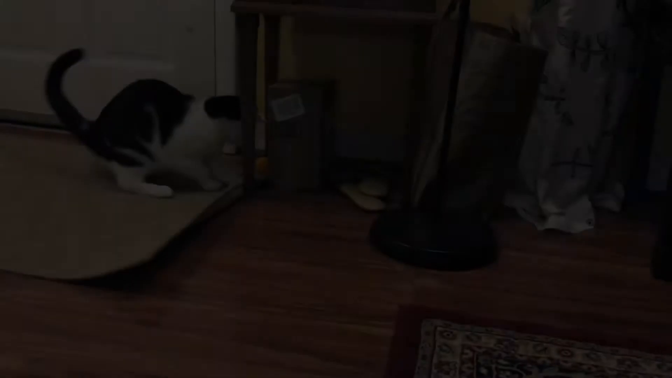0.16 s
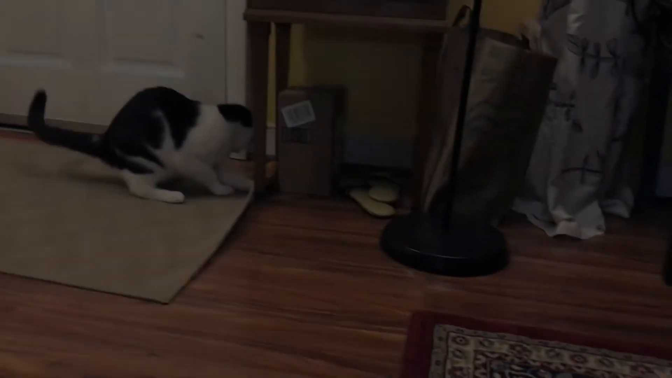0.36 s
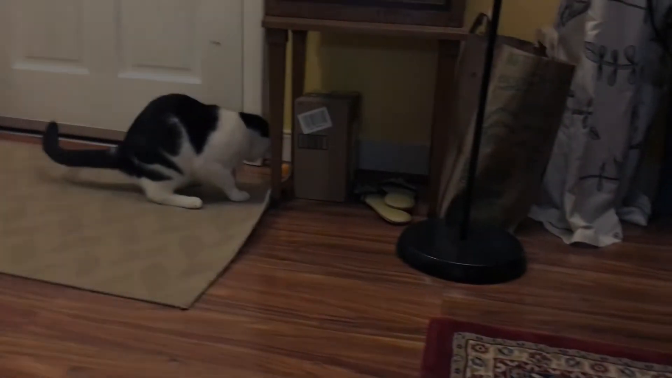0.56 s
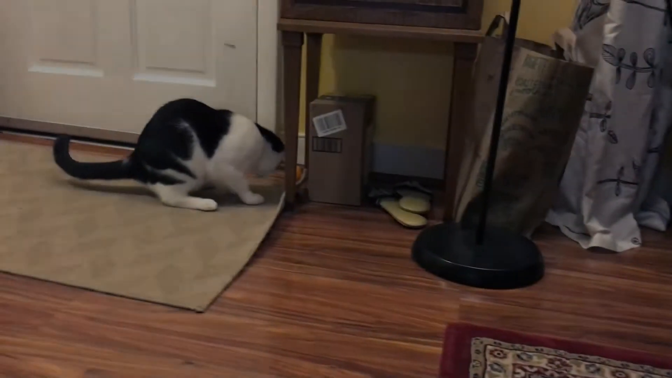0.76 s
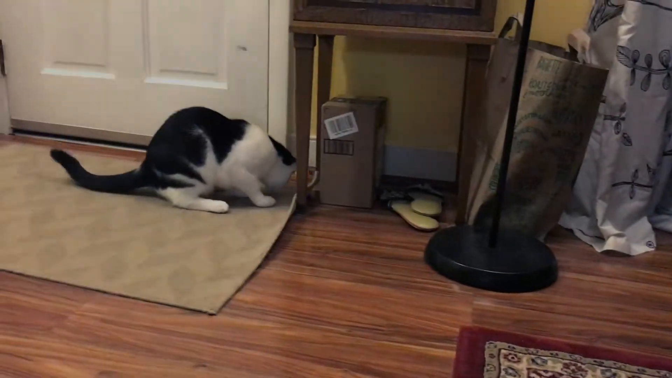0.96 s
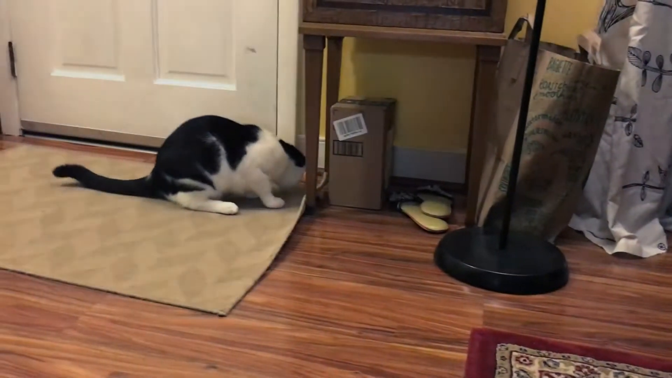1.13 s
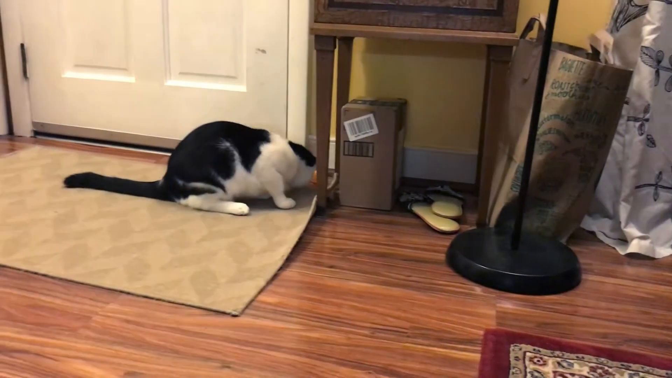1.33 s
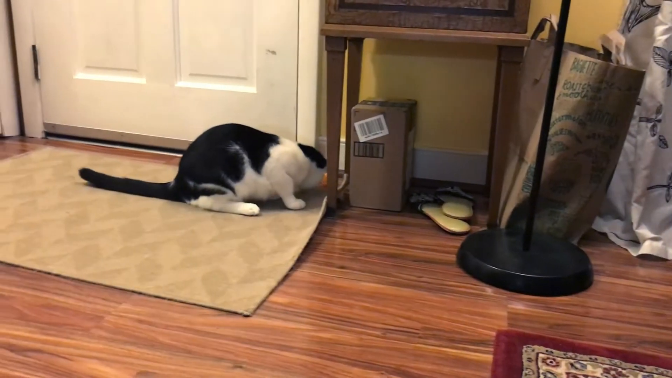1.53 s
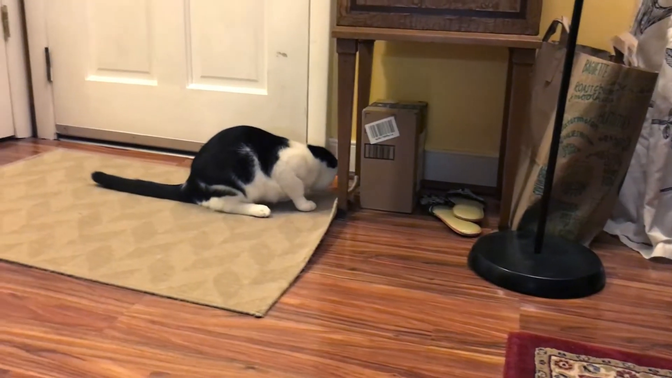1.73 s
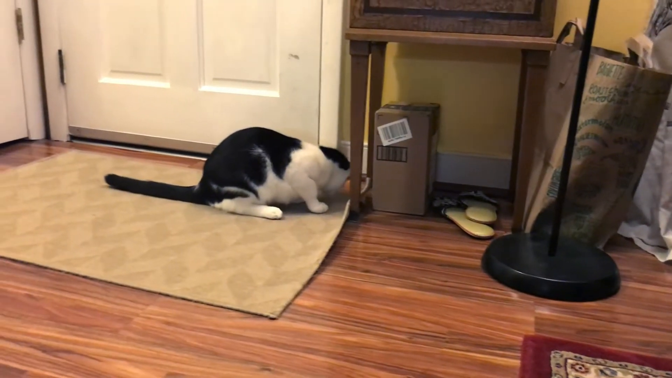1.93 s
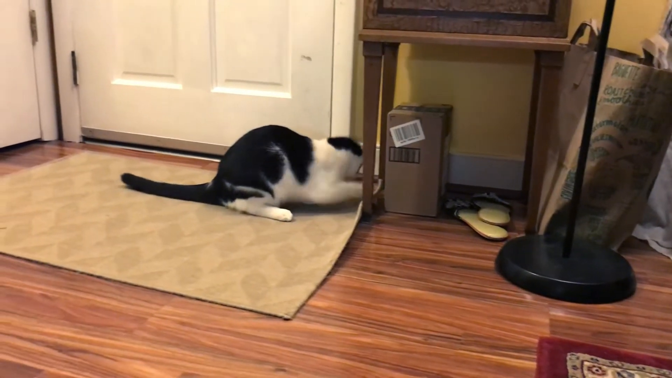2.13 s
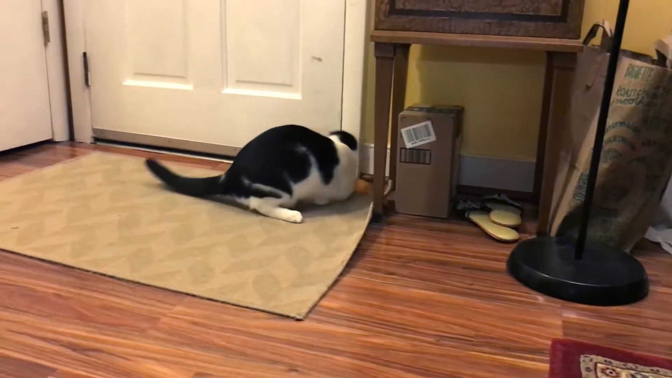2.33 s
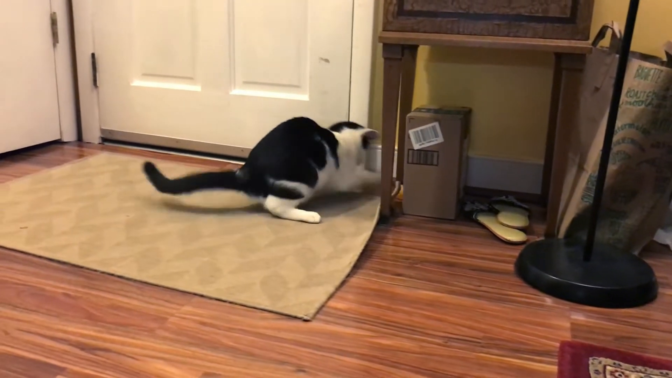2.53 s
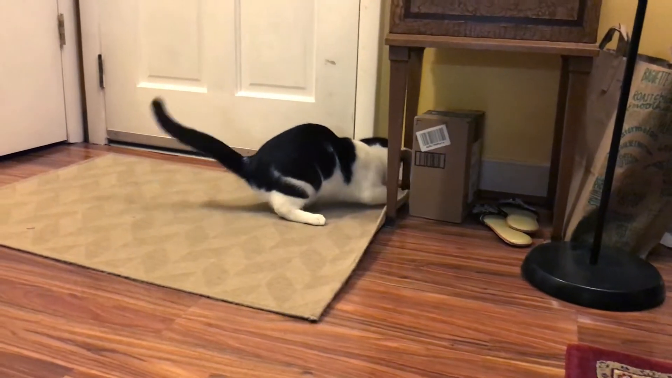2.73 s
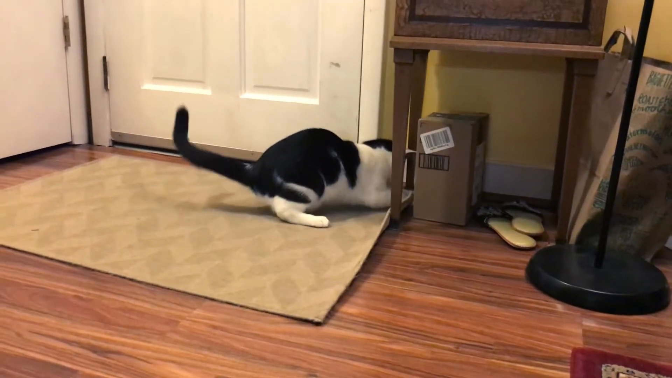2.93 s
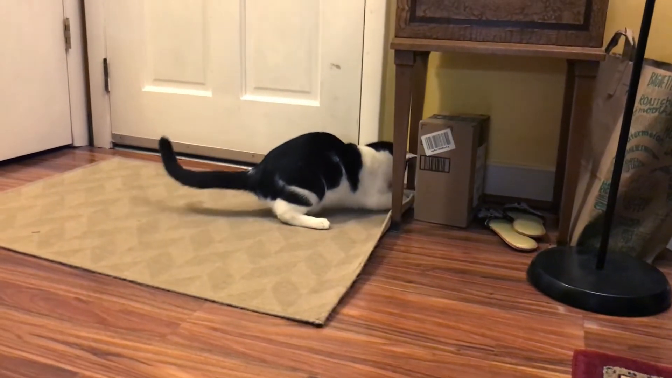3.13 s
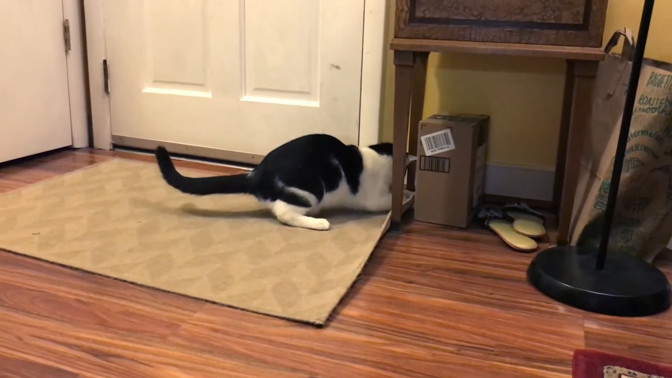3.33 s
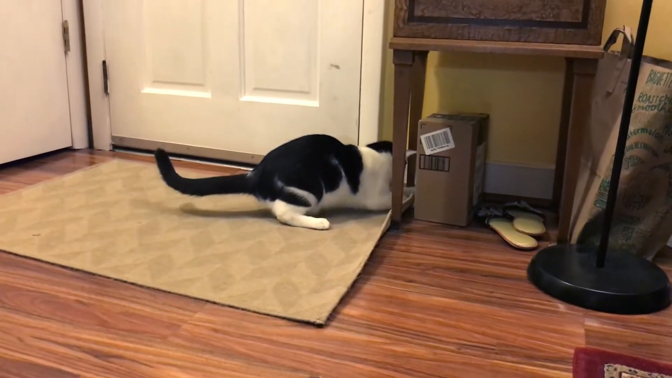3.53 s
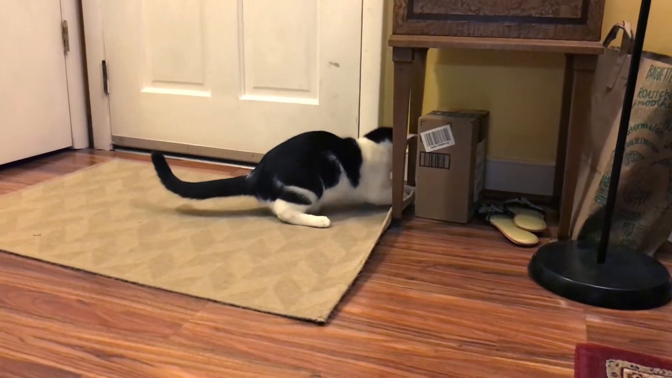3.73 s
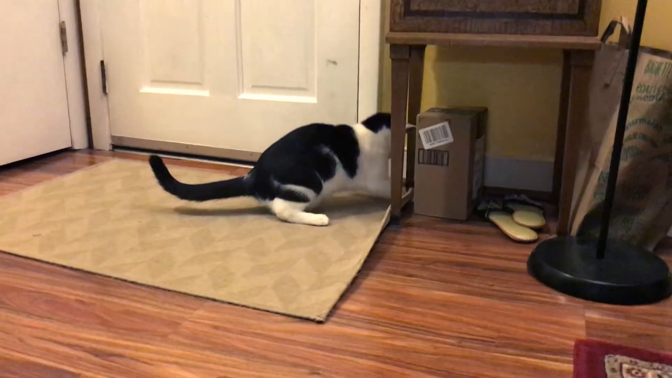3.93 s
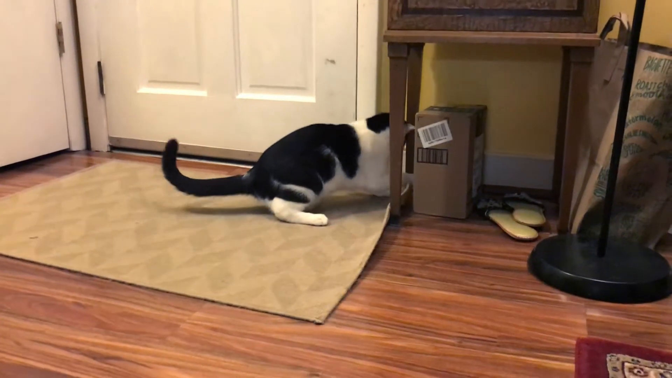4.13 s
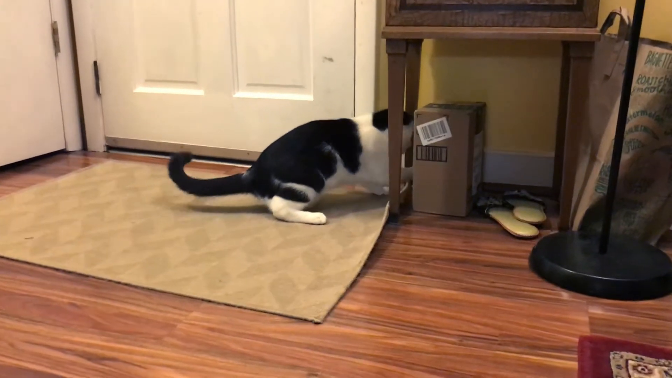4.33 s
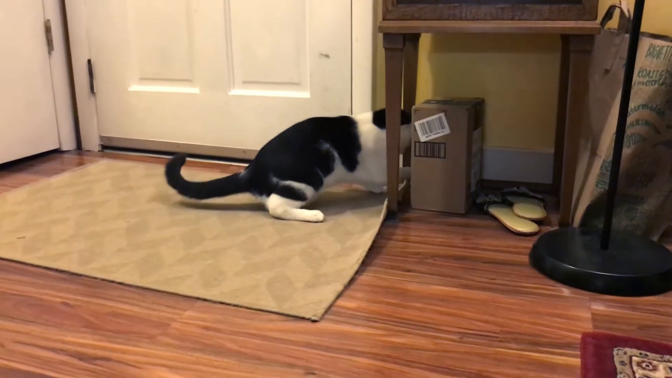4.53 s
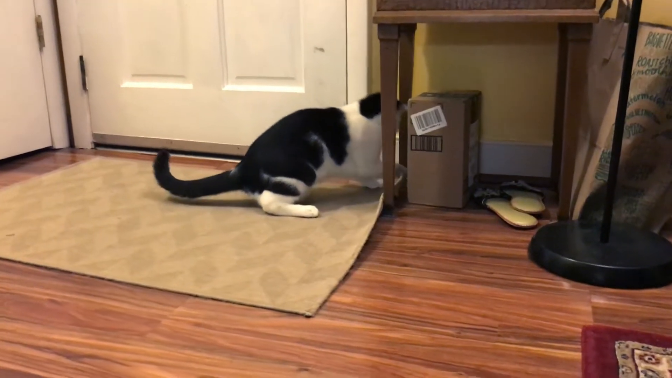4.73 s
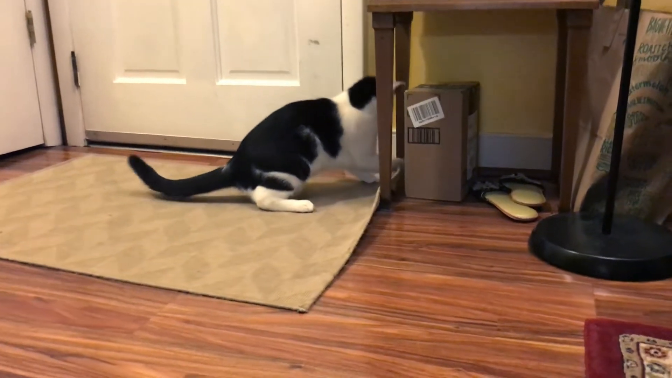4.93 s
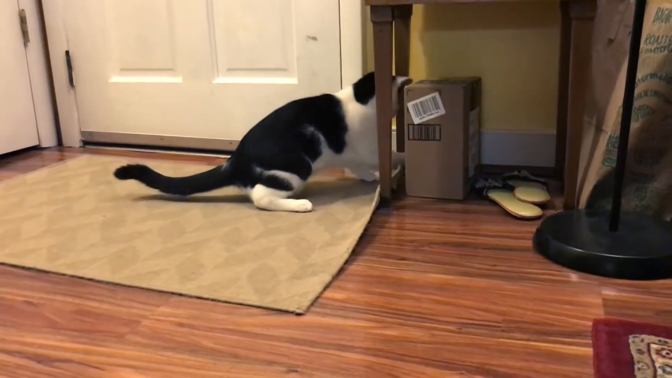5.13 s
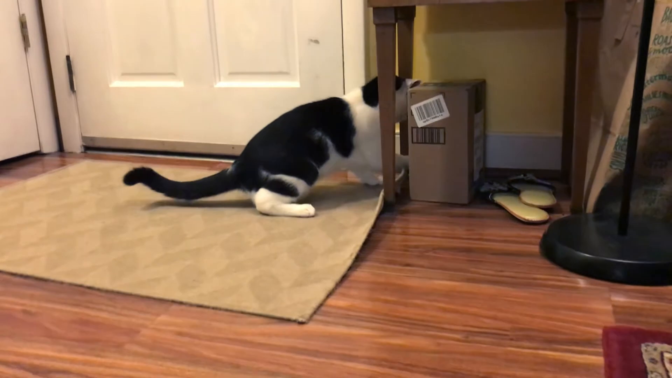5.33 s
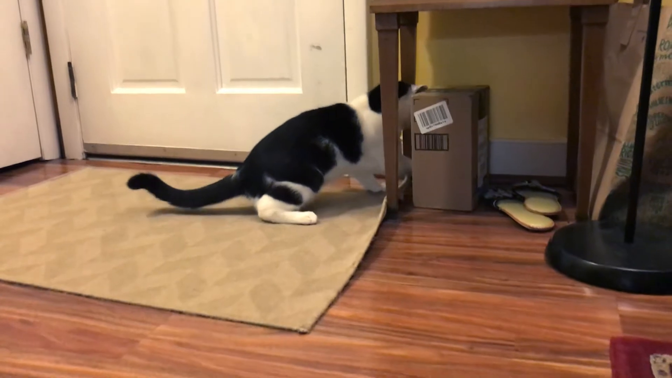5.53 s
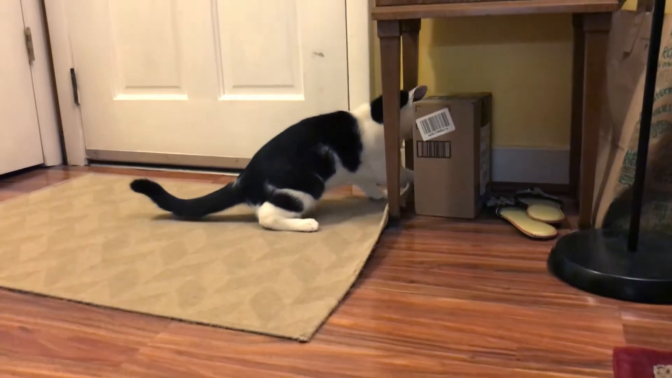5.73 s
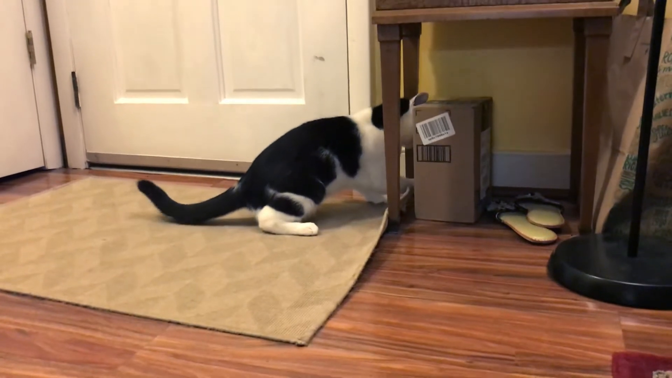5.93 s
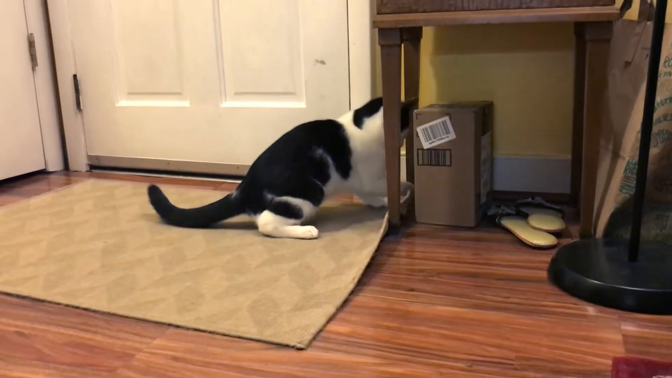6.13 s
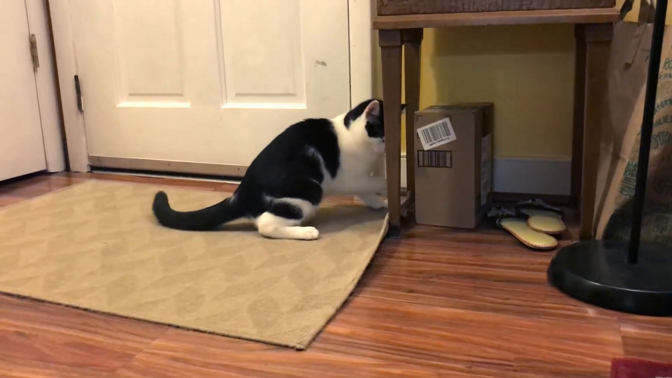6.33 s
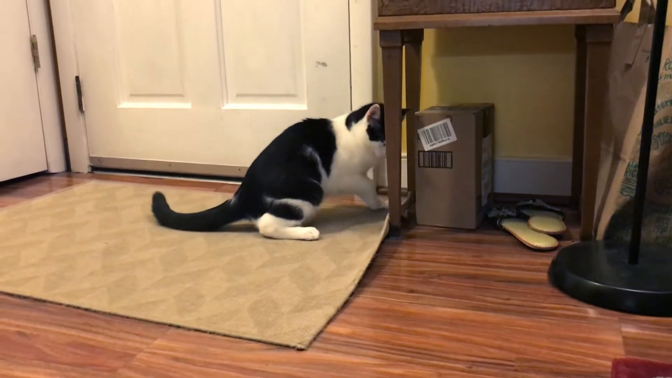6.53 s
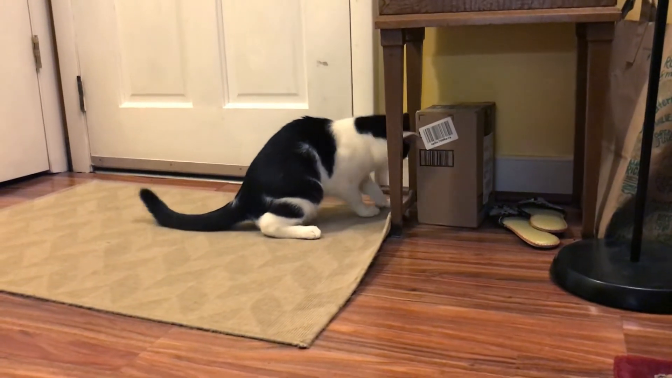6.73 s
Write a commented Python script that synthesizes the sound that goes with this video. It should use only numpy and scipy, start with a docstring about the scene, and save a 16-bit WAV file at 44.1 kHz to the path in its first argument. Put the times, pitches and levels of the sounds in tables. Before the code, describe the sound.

In a small hallway with a low rumble, faint wavering hum and thin hiss, a small hard toy clacks and patters to rest on wood. After a lull, sharp taps lead into a loud cat pounce with claws tearing at a mat. Softer paw knocks follow, thinning out to near quiet. A phone picks it up from a few metres away.

```python
"""Cat playing on a doormat

A cat plays at the edge of a doormat in a small hallway, a few metres from a phone. A small hard toy taps and
settles on the wood floor: short bursts of contact noise ring its resonances. The cat pounces, then paws at it;
softer, longer bursts ring floorboards and table leg. Fur and claws on the mat are shaped bands of noise, with
two faint squeaks late on. Hum and low rumble lie under it all, with a thin steady hiss."""
import sys
import numpy as np
from scipy import signal
from scipy.fft import rfft, irfft
from scipy.io import wavfile

SR = 44100
rng = np.random.default_rng(int(sys.argv[2]) if len(sys.argv) > 2 else 0)


def to_wav(s):
    """Save 16-bit WAV."""
    ch = np.atleast_2d(s).T  # columns
    pcm = np.round(np.clip(ch, -1, 1) * 32767)  # PCM
    wavfile.write(sys.argv[1], SR, pcm.astype(np.int16))


N = 298322
TIME = np.arange(N) / SR
HIT_TIME = TIME[:SR // 10]

# registers of an impact: (low edge f/Hz, high edge f/Hz)
BOOM, THUD, KNOCK = (80, 170), (170, 750), (680, 1750)
CRACK, SNAP, TICK = (1750, 7500), (3600, 6500), (8500, 15500)


def undb(db):
    """Decibels to gain."""
    return 10 ** (np.asarray(db) / 20)


def level(x, db):
    """Set the rms level."""
    return x * undb(db) / np.sqrt(np.mean(x ** 2))


def band(x, edges, order=3):
    """Causal band-pass."""
    sos = signal.butter(order, np.minimum(edges, SR / 2 - 1), "band", fs=SR, output="sos")
    return signal.sosfilt(sos, x)


def ring(x, modes):
    """Drive a set of damped resonances; neighbours in the list swing in opposite senses."""
    total = 0
    for k, (hz, width, db) in enumerate(modes):
        b, a = signal.iirpeak(hz, hz / width, SR)
        total = total + (-1) ** k * undb(db) * signal.lfilter(b, a, x)
    return total


def noise(points):
    """Noise with a spectrum of (f/Hz, level/dB) points, joined along a log-frequency axis."""
    hz, db = np.transpose(points)
    log_hz = np.log(np.arange(N // 2 + 1) * SR / N + 1)
    gain = undb(np.interp(log_hz, np.log(hz), db))
    return irfft(rfft(rng.standard_normal(N)) * gain, N)


def walk(rate):
    """Random wander with a spread near 1: straight lines between `rate` random points a second."""
    return np.interp(TIME * rate, np.arange(N // 10), rng.standard_normal(N // 10))


def add(out, s, x):
    """Mix a short sound in at time s."""
    start = max(int(s * SR), 0)
    out[start:start + len(x)] += x[:N - start]


def contact(length, first_db):
    """The force of one impact: a first touch, then a quickly dying chatter with no pitch of its own."""
    count = len(HIT_TIME)
    chatter = rng.standard_normal(count) * np.exp(-HIT_TIME / max(length, 1 / SR))
    chatter /= np.linalg.norm(chatter)
    chatter[0] += undb(first_db)
    spectrum = rfft(chatter, 2 * count)
    # keep the phase but flatten the spectrum to a quarter of its dB range
    return irfft(spectrum / np.abs(spectrum) ** (3 / 4))[:count]


def part(x, edges, db):
    """One register of an impact; its level is its whole energy averaged over 20 ms."""
    y = band(x, edges)
    return y * undb(db) / np.sqrt(np.sum(y ** 2) / (.02 * SR))


def hallway(x, wet_db):
    """Close walls answer within milliseconds, with fresh reflections on each call; the treble dies first."""
    t = TIME[:SR // 2]
    build_s = 0.0019
    scatter = rng.standard_normal(len(t))
    response = np.zeros(len(t))
    # (edges f/Hz, time to fall 60 dB t/s, level/dB)
    ranges = (((60, 700), 0.3, 0), ((700, 4500), 0.31, 0), ((4500, 17000), 0.23, -2.0))
    for edges, t60, db in ranges:
        tail = scatter * np.exp(-np.log(1000) * t / t60) * (1 - np.exp(-(t / build_s) ** 2))
        response += undb(wet_db + db) * band(tail / np.linalg.norm(tail), edges)
    response[0] += 1  # direct sound
    return signal.fftconvolve(x, response)


def room_tone():
    """A low rumble and thin hiss, with the slightly wavering hum of an appliance."""
    # spectrum of the air, shape only: (f/Hz, level per Hz/dB)
    air_spectrum = [(15, -50.5), (25, -7), (70, -3), (105, -3.5), (148, -10), (184, -11), (211, -14),
                    (241, -16), (392, -20), (425, -21), (691, -25.5), (749, -24), (1510, -29),
                    (10300, -40.5), (12100, -39.5), (15800, -40)]
    # mains hum: (f/Hz, level/dB)
    hum_partials = [(59.6, -81), (179.4, -66.5), (299, -81.5), (358.8, -87)]
    air = level(noise(air_spectrum), -61.92) * undb(0.77 * walk(0.37))
    hum = np.zeros(N)
    for hz, db in hum_partials:
        phase = 2 * np.pi * hz * TIME + 0.53 * walk(4.0)  # waver in radians
        hum += level(np.sin(phase), db)
    return air + hum


def blows(rows, boom_db, crack_db, tick_db, swing_s, spot_db):
    """Soft, heavy paws drive the wood; each spot favours one low mode, which enters a moment late."""
    # floorboards and table: (f/Hz, width/Hz, level/dB)
    board_modes = [(114, 120, -9), (166.5, 90, 1.5), (217, 70, 3.5), (292, 71, 1.5), (362, 47, 2),
                   (542, 102, -0.5), (746, 59, -2.5), (828, 55, 0), (986, 110, 3.5), (1236, 160, -0.5),
                   (1453, 120, -3.5), (1725, 140, -6), (2050, 300, -11), (2410, 180, -9.5),
                   (2830, 650, -15), (4054, 1600, -21), (5450, 2500, -25), (12100, 6000, -29.5)]
    soft_pad = .2  # dB of scuff lost per dB of thud: a softer pad thuds more and scuffs less
    out = np.zeros(N)
    for s, db, thud_db, length, spot_hz in rows:
        gain = undb(db)
        knock = part(ring(contact(length, first_db=-2.5), board_modes), KNOCK, 0)
        # the pad slides a little as it lands
        slide = ring(contact(1.7 * length, first_db=-23.0), board_modes)
        scuff = part(slide, CRACK, crack_db) + part(slide, TICK, tick_db)
        scuff = undb(-soft_pad * thud_db) * scuff
        add(out, s, gain * hallway(knock + scuff, wet_db=-2.5))

        floor = ring(contact(length, first_db=-3.5), board_modes)
        floor = part(floor, BOOM, boom_db) + part(floor, THUD, thud_db - 2.5)
        add(out, s + swing_s / 2, gain * hallway(floor, wet_db=-4.0))

        spot = ring(contact(length, first_db=7), [(spot_hz, 26, 0)])  # 26 Hz wide
        spot = part(spot, THUD, thud_db + spot_db)
        add(out, s + swing_s, gain * hallway(spot, wet_db=-1.0))
    return out


def paws():
    """Landings make the whole floor boom; pats mostly ring the spot that they hit."""
    # the cat lands with its weight on the floor:
    # (t/s, knock level/dB, basic thud over knock/dB, basic chatter decay/s, low mode of the spot f/Hz)
    landing_rows = [(0.0, -49.5, -0.5, 0.0095, 360), (2.6535, -40, 7, 0.0067, 368),
                    (2.7296, -27.5, 3, 0.0073, 384.6)]
    # a forepaw bats at boards and table leg:
    # (t/s, knock level/dB, basic thud over knock/dB, basic chatter decay/s, low mode of the spot f/Hz)
    pat_rows = [(0.7318, -68.5, 4.5, 0.013, 352), (3.006, -51, 2.5, 0.011, 264),
                (3.338, -42, 5, 0.0065, 215), (3.752, -55, 6, 0.025, 202), (4.391, -56.5, -2, 0.015, 363),
                (4.688, -46.5, 0, 0.0055, 357), (5.259, -53, -8, 0.035, 257),
                (5.283, -52, 9.5, 0.0058, 228), (5.3148, -53, -3.5, 0.0024, 360),
                (5.3877, -54, 2, 0.0014, 303), (5.572, -44, 3, 0.0027, 305), (5.8476, -62, 7, 0.0016, 246),
                (5.879, -55.5, 4.5, 0.0016, 210)]
    landings = blows(landing_rows, boom_db=-6.5, crack_db=-7, tick_db=-25.5, swing_s=0.0019, spot_db=-10)
    pats = blows(pat_rows, boom_db=-21.5, crack_db=-8, tick_db=-19.5, swing_s=0.00378, spot_db=-3.5)
    return landings + pats


def bounces(count=8):
    """The settling toy as tap rows: gaps shrink by the restitution, and every bounce loses the same dB."""
    drop_s, drop_db, first_gap_s = .3635, -45.5, .043
    restitution, loss_db = .815, 2.5
    k = np.arange(count)
    gaps = first_gap_s * restitution ** k
    times = drop_s + np.cumsum(gaps) - gaps
    return list(zip(times, drop_db - loss_db * k, np.zeros(count)))


def taps():
    """The toy clacks on the boards; the harder the contact, the more crack, snap and tick."""
    # toy and claw taps: (t/s, knock level/dB, hardness of the contact/dB)
    tap_rows = [(0.0573, -42, 0), (0.139, -41, 1), (0.212, -44, 3.5), (2.1513, -63.5, -5.5),
                (2.304, -55.5, 4), (2.378, -29, 4), (2.4414, -40.5, 0.5), (2.5356, -52, 18),
                (2.556, -52, 4), (2.5833, -49, 3), (2.6089, -49.5, -1), (3.338, -46.5, -6),
                (4.6883, -38.5, -11.5), (5.388, -52.5, -8.5), (5.571, -57, 5), (5.8063, -52, 19.5),
                (6.7485, -58.5, -3)]
    # the toy on the floor: (f/Hz, width/Hz, level/dB)
    toy_modes = [(389, 110, -2), (807, 63, -1.5), (908, 110, -2.5), (1220, 146, 3.5), (1455, 335, -2.5),
                 (1730, 274, -2), (2170, 380, -8.5), (2730, 530, -8.5), (3243, 230, -5), (3700, 420, -12),
                 (4540, 900, -17), (6160, 1500, -24.5)]
    out = np.zeros(N)
    for s, db, hardness_db in list(tap_rows) + bounces():
        force_db = db + 45  # over a -45 dB reference tap
        # registers relative to the knock: force trims thud and tick, but sharpens the crack
        thud_db = -8 - 0.22 * force_db
        crack_db = -9.5 + 0.12 * force_db + 0.45 * hardness_db
        tick_db = -15 - 0.081 * force_db + hardness_db
        # firm, hard contacts are briefer
        length = .0038 * undb(-.3 * (force_db + hardness_db))
        body = ring(contact(length, first_db=-1), toy_modes)
        clack = part(body, THUD, thud_db) + part(body, KNOCK, 0) + part(body, CRACK, crack_db)
        scrape = contact(1.5 * length, first_db=-18.5)
        tick = part(scrape, TICK, tick_db) + part(scrape, SNAP, tick_db - 12)
        add(out, s, hallway(undb(db) * (clack + tick), wet_db=-2.0))
    return out


def sweeps():
    """Fibres snap past fur and claws: a fine hiss with a low rasp, and a stronger rip where a claw catches."""
    # fur sweeping the mat: (start t/s, swell/s, start to release/s, hiss level/dB)
    sweep_rows = [(2.303, .01, .085, -57.5), (2.685, 0.0244, 0.033, -58), (2.768, .012, 0.096, -56),
                  (3.34, .035, 0.05, -60.5), (3.77, .02, 0.03, -70.5), (4.644, 0.037, 0.06, -57),
                  (4.937, 0.036, 0.067, -73.5), (5.646, .035, .045, -72), (5.946, 0.041, 0.077, -73)]
    # a claw snags in the mat and tears free: (peak t/s, hiss level/dB)
    snag_rows = [(0.283, -70), (2.482, -52.5), (2.776, -50.5), (2.791, -49.5), (3.785, -72), (3.95, -76.5),
                 (4.016, -73.5), (4.409, -67.5), (4.899, -73), (5.281, -63)]
    release_s, snag_rise_s, snag_fall_s = 0.018, 0.0041, 0.0048
    rasp_db, rip_db = -3, 8.5  # relative to the hiss

    grain_db = 3.7 * walk(900) + 1.8 * walk(90)
    fibres = rng.standard_normal(N) * undb(grain_db)
    hiss = level(band(fibres, (8600, 15000), order=2), 0)
    rasp = level(band(fibres, (1100, 6200), order=2), 0)
    rip = level(band(fibres, (1900, 7400), order=2), 0)

    fur = np.zeros(N)
    for s, swell, length, db in sweep_rows:
        rise = np.clip((TIME - s) / swell, 0, 1)
        fall = np.exp(-np.maximum(TIME - s - length, 0) / release_s)
        fur += undb(db) * rise * fall
    claws = np.zeros(N)
    for s, db in snag_rows:
        distance = np.maximum((s - TIME) / snag_rise_s, (TIME - s) / snag_fall_s)
        claws += undb(db) * np.exp(-distance)
    return fur * (hiss + undb(rasp_db) * rasp) + claws * (hiss + undb(rip_db) * rip)


def squeaks():
    """Thin, unsteady whistles high in the treble: narrow noise bands under bell-shaped swells."""
    # faint high squeaks: (peak t/s, centre f/Hz, time from peak to 1/e /s, level/dB)
    squeak_rows = [(6.067, 11030, .03, -82), (6.53, 11860, 0.023, -79)]
    out = np.zeros(N)
    for s, hz, length, db in squeak_rows:
        whistle = band(rng.standard_normal(N), (hz - 170, hz + 170), order=2)
        out += level(whistle, db) * np.exp(-((TIME - s) / length) ** 2)
    return out


def port(x):
    """The microphone port lifts and notches the treble through resonances in series."""
    # treble resonances of the port: (f/Hz, width/Hz, gain at the centre/dB)
    port_peaks = [(9020, 110, 11.5), (9370, 100, -35), (9750, 300, 3.5), (7400, 3700, -2.5),
                  (12270, 2700, 5), (15400, 3000, -5.5)]
    for hz, width, db in port_peaks:
        x = x + (undb(db) - 1) * ring(x, [(hz, width, 0)])
    return x


def scene():
    """Everything the cat does sounds through the hallway and port, over the room tone."""
    mat = hallway(sweeps() + squeaks(), wet_db=-1.5)[:N]
    cat = paws() + taps() + mat
    return (port(cat) + room_tone())[None]


def record(dry):
    """The phone cuts the deepest rumble and the top."""
    lean = band(dry, (34, 20000), order=6)
    # steep low-pass at 15800 Hz: 0.2 dB ripple, 70 dB rejection
    top_cut = signal.ellip(8, .2, 70, 15800, fs=SR, output="sos")
    return signal.sosfilt(top_cut, lean)


dry = scene()
out = record(dry)
to_wav(out)
```